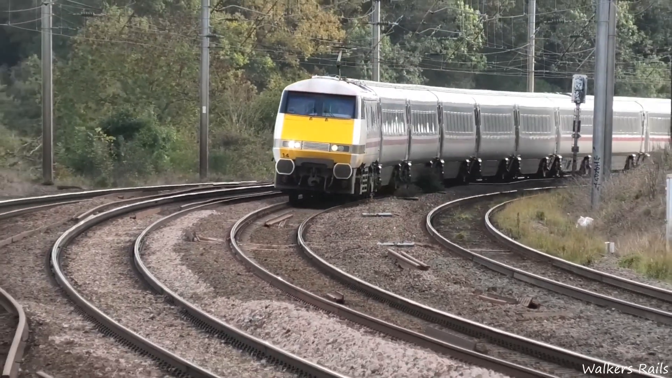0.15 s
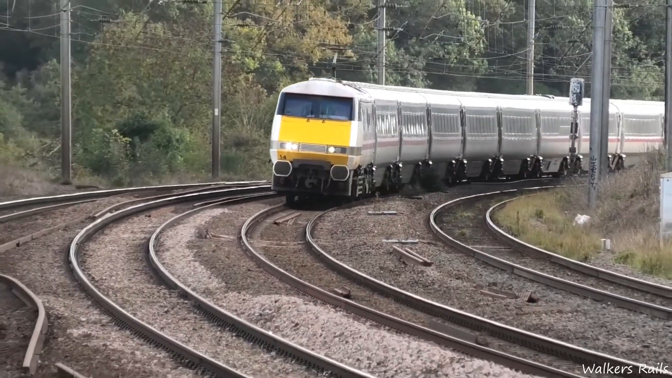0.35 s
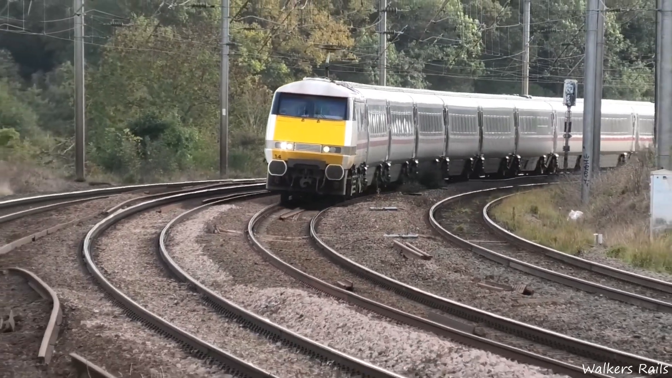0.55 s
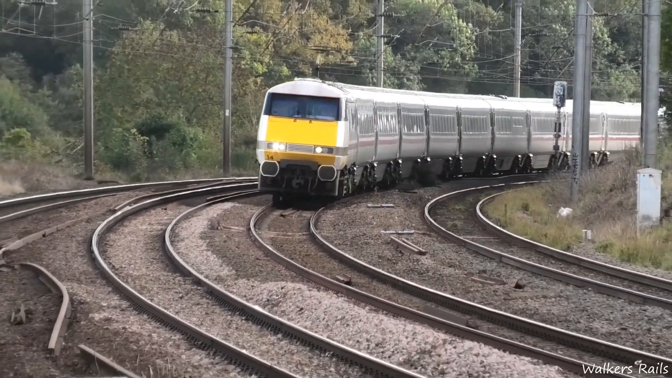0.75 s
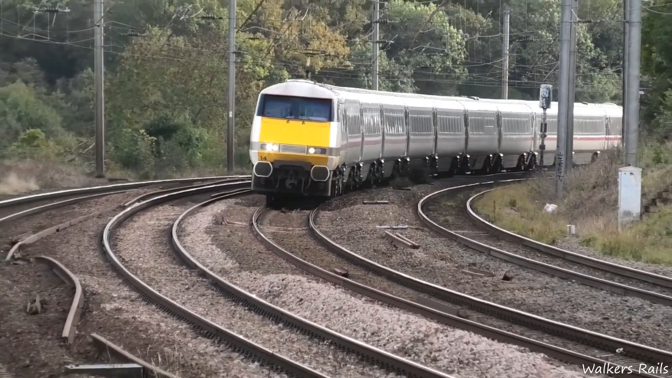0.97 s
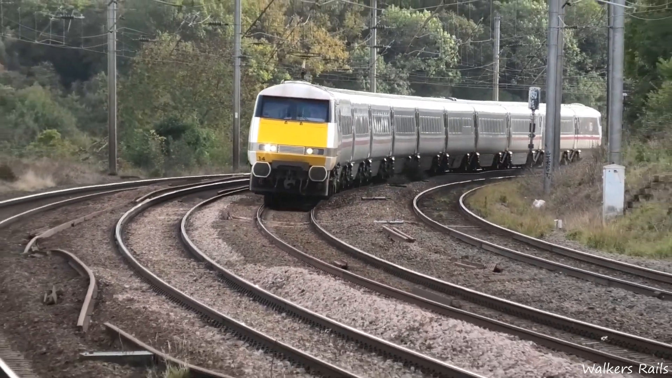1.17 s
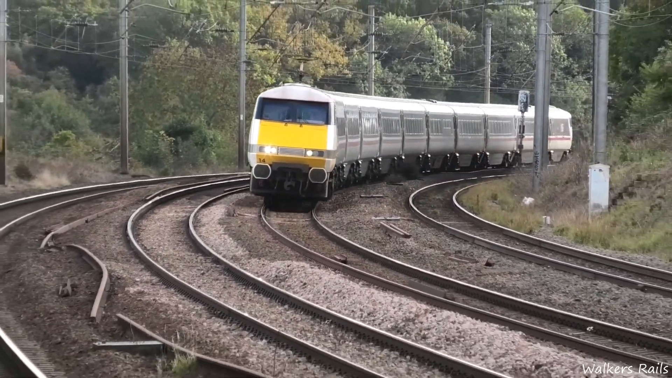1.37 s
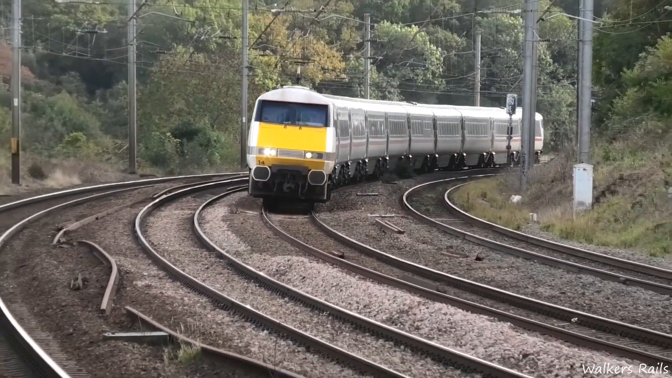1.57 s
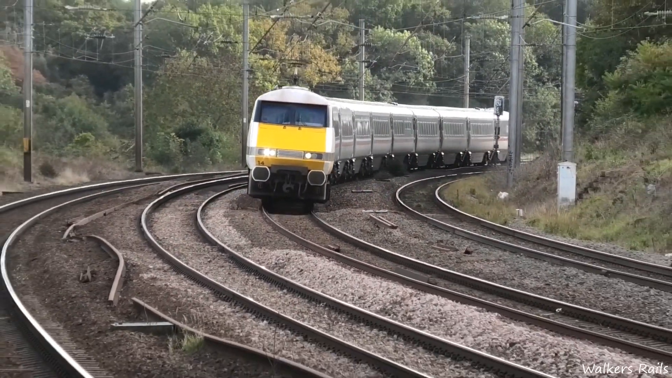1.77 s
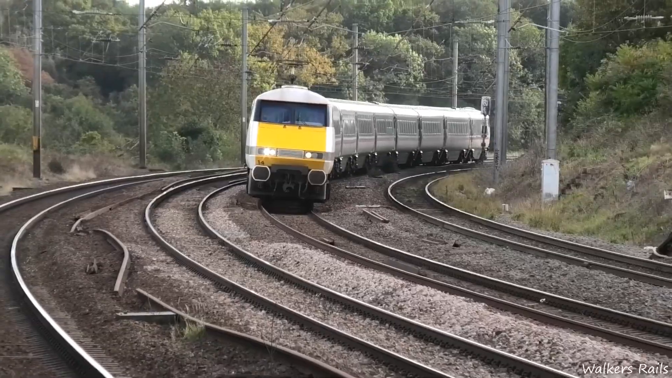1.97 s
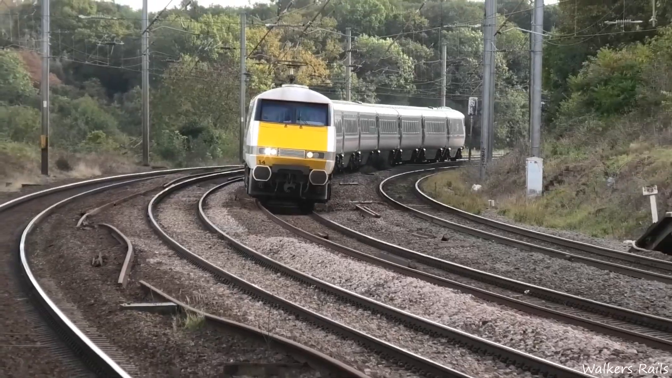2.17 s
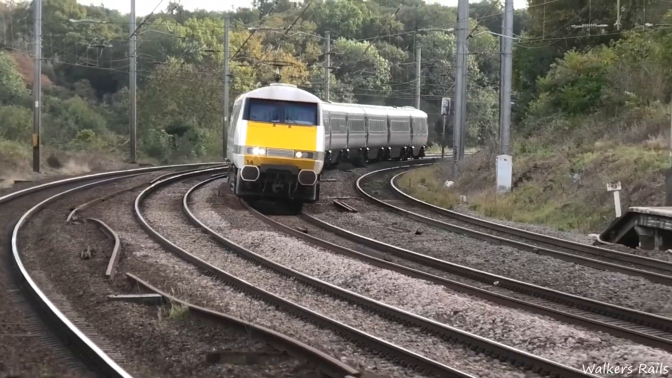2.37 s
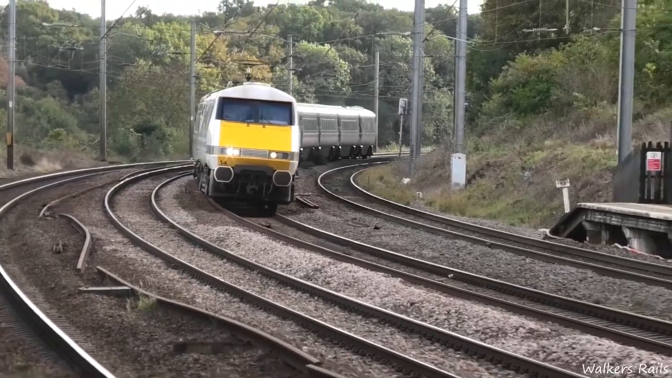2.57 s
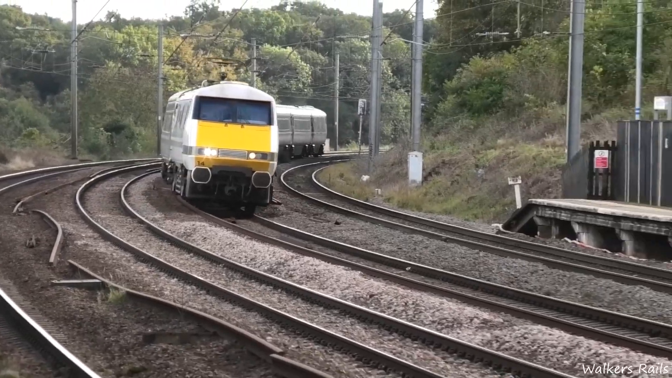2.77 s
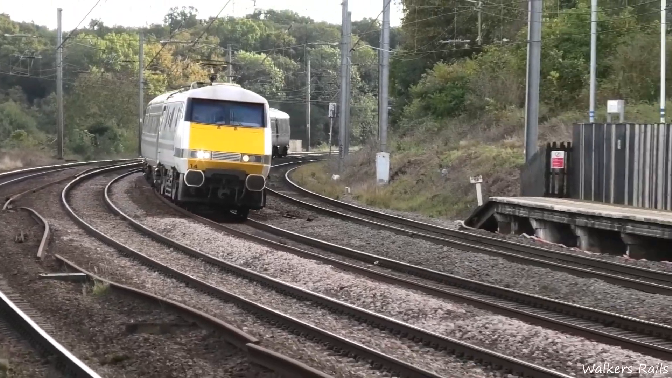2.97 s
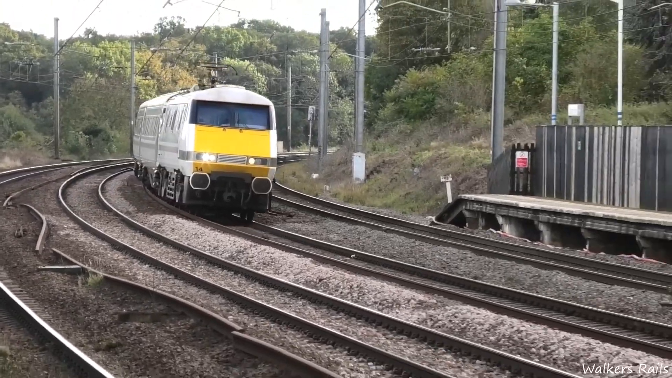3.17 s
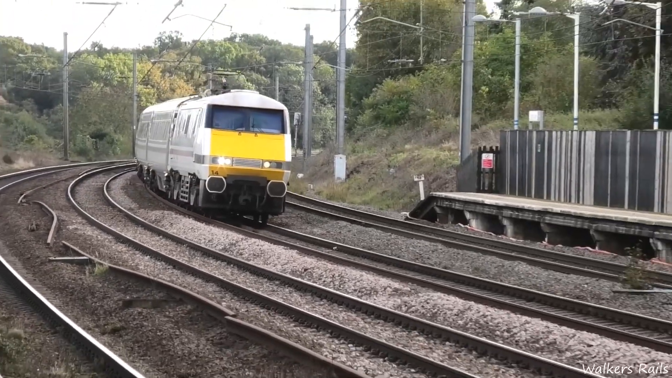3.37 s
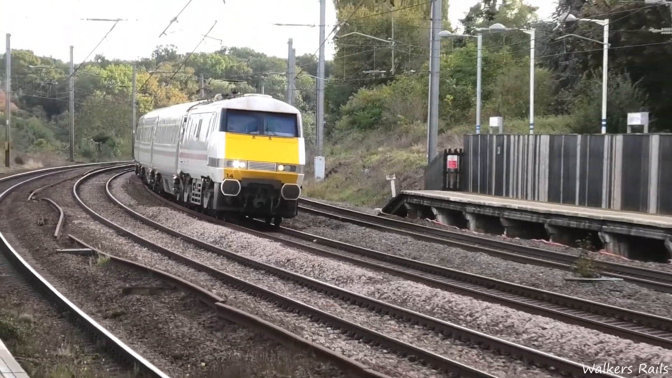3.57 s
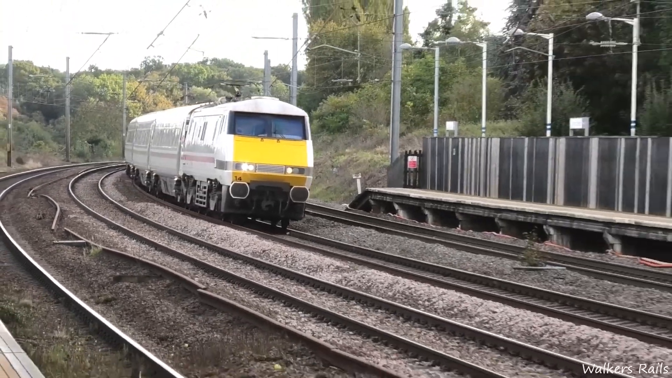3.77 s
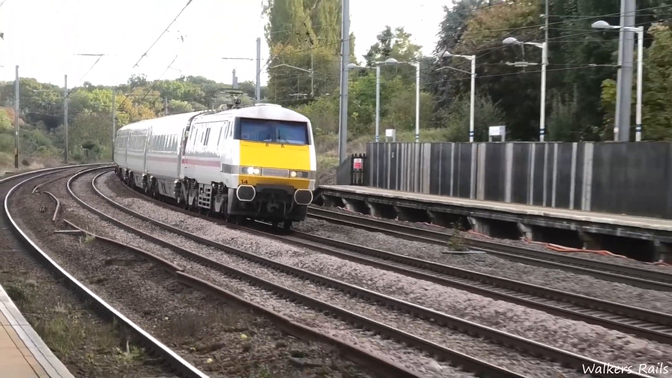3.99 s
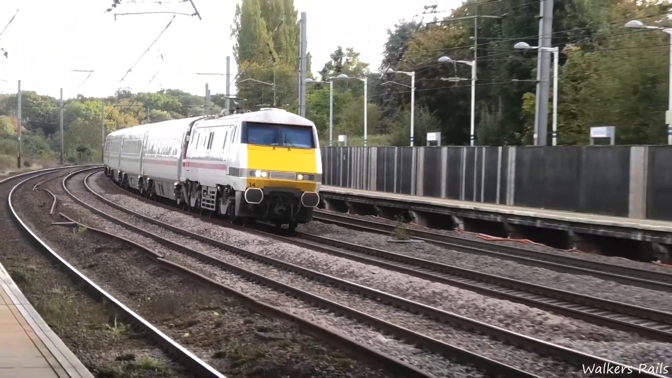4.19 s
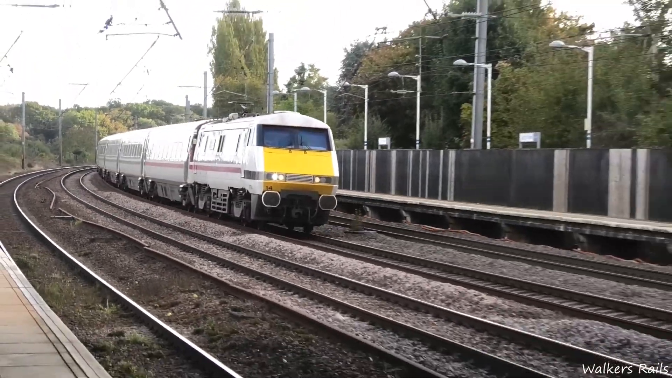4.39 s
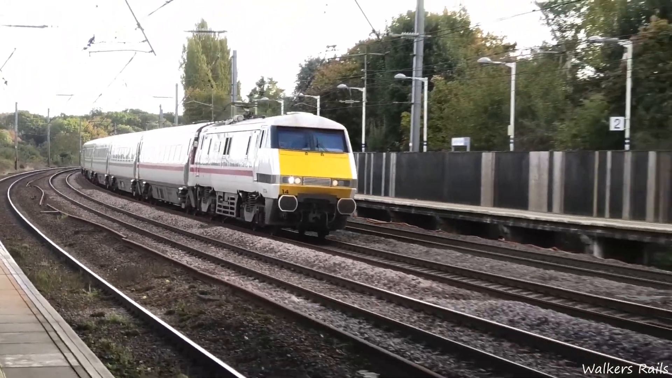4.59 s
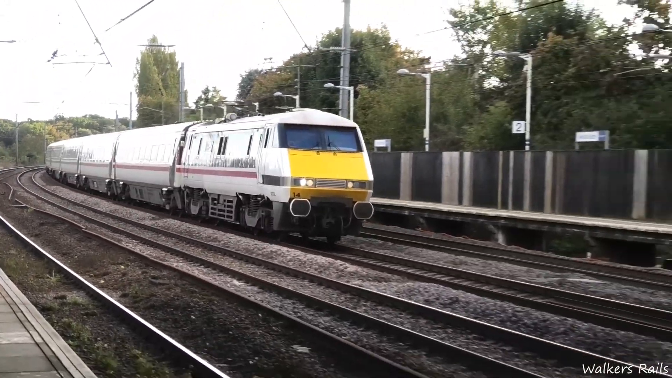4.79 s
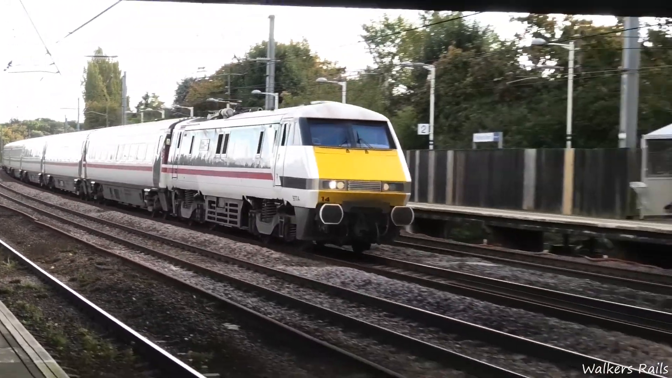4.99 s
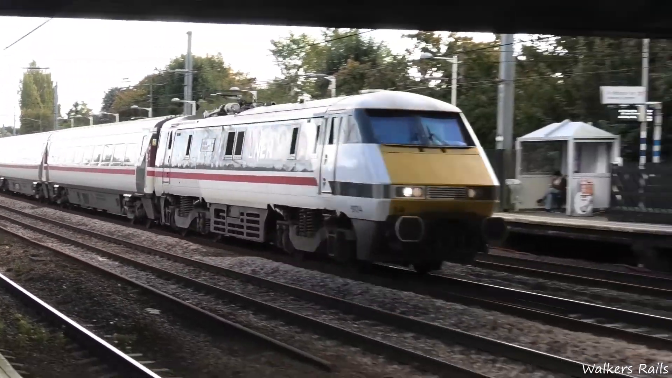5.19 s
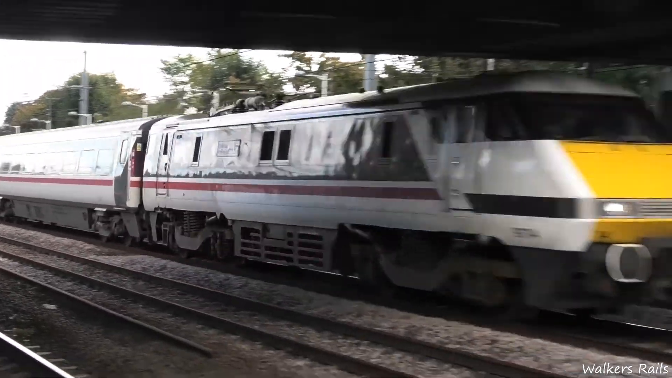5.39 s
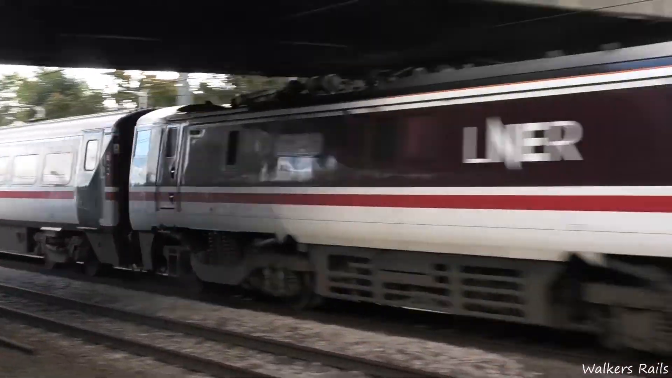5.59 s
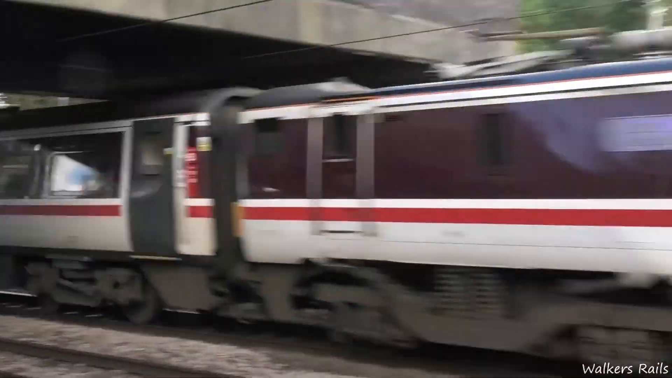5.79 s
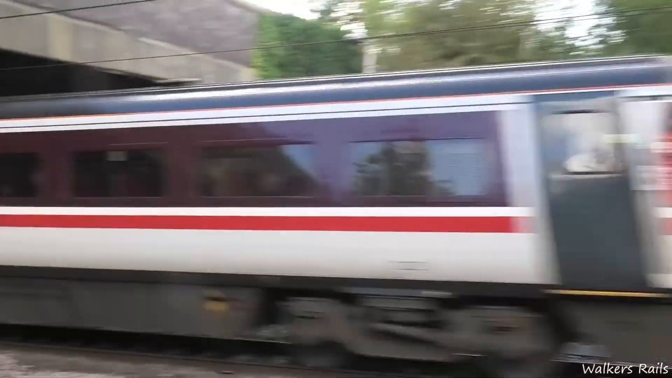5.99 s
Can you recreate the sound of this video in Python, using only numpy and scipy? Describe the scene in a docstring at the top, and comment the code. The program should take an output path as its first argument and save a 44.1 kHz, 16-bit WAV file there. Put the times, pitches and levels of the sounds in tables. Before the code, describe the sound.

An electric express approaches, heard from a station platform close to the track. It starts as a quiet wheel roar with low rumble and a steady motor whine, with light axle knocks over rail joints through the first two seconds. From about 1.5 seconds the rails sing and a thin, high wheel tone rings in the curve. The whine comes forward near 2.8 seconds, and a brief metallic ring follows around 3.3. Everything grows steadily louder, with heavier knocks at about 3.2, 4.1 and 4.4 seconds. From 5 seconds, deep rumble and hissing air open up as the train draws level. Hard knocks and droning surges land around 5.4 and 5.9. The locomotive passes at about 5.7, its whine dropping in pitch amid metallic whooshes. The roar is still at full strength at 6 seconds, slightly overloading the microphone.

```python
"""Express train passing a platform

One microphone on a station platform, 7 m from the track. An electric express rounds a curve and
sweeps past at 38 m/s. Rough wheels roar, the rails sing ahead of the train, axles knock over joints
and the locomotive whines. Rumble and rushing air open up as it draws level, the whine drops in
pitch, and the microphone overloads."""
import sys
import numpy as np
from scipy import signal
from scipy.fft import irfft, next_fast_len
from scipy.io import wavfile

SR = 44100
rng = np.random.default_rng(int(sys.argv[2]) if len(sys.argv) > 2 else 0)


def unload_wav(signal):
    """Save mono or channel-first audio to the path in sys.argv[1] as 16-bit WAV at rate SR, clipped to [-1, 1]."""
    wavfile.write(
        sys.argv[1],
        SR,
        np.round(np.clip(np.atleast_2d(signal).T, -1, 1) * 32767).astype(np.int16),
    )


N = 266364
T = np.arange(N) / SR
SPEED_M_S, MIC_DISTANCE_M, MOTORS_PASS_S = 38, 7, 5.68


def undb(db):
    """Decibels to gain."""
    return 10 ** (np.asarray(db) / 20)


def swell(s, half_s):
    """A bell curve that rises to 1 at time s and falls again."""
    return np.exp(-.5 * ((T - s) / half_s) ** 2)


def ramp(s, rise_s):
    """A straight rise from 0 to 1 that starts at time s, then holds."""
    return np.clip((T - s) / rise_s, 0, 1)


def wander(hz):
    """Smooth random motion of unit spread, about hz wide."""
    n = next_fast_len(N, real=True)
    f = np.arange(n // 2 + 1) * SR / n
    weight = np.exp(-.5 * np.minimum(f / hz, 10) ** 2)
    spectrum = rng.standard_normal(len(f)) + 1j * rng.standard_normal(len(f))
    motion = irfft(weight * spectrum, n)[:N]
    return motion / motion.std()


def shaped(x, spectra, times_s, size=2048):
    """Colour white noise, gliding from one spectrum to the next at constant power."""
    f, s, frames = signal.stft(x, SR, nperseg=size, noverlap=size - size // 4)
    octave, db = np.log2(f + 1), 0
    for rows, share in zip(spectra, np.eye(len(spectra))):
        hz, level = np.transpose(rows)
        outside = np.abs(octave - np.clip(octave, np.log2(hz[0]), np.log2(hz[-1])))
        colour = np.interp(octave, np.log2(hz), level) - 40 * outside  # skirts of 40 dB per octave
        db = db + np.outer(colour, np.interp(s, times_s, share))
    gain = undb(db)
    gain = gain / np.sqrt(np.mean(gain ** 2, axis=0))
    return signal.istft(frames * gain, SR, nperseg=size, noverlap=size - size // 4)[1][:N]


def blurred_tone(hz, width_hz):
    """A line of half unit power, blurred by many wheels and paths."""
    phase = 2 * np.pi * np.cumsum(np.broadcast_to(hz, N)) / SR
    return (wander(width_hz / 2) * np.cos(phase) + wander(width_hz / 2) * np.sin(phase)) / np.sqrt(2)


def firm_tone(hz, tremble, tremble_hz):
    """A line of unit power that keeps its strength and only trembles in pitch."""
    pitch = hz * (1 + tremble * wander(tremble_hz))
    return np.sqrt(2) * np.sin(2 * np.pi * np.cumsum(pitch) / SR)


def contact(rough_db, flutter_hz):
    """Countless tiny impacts whose force flutters with the load on the wheels."""
    force = rng.standard_normal(N) * undb(rough_db * wander(flutter_hz))
    return force / force.std()


def approach(arrival_s, near_db, db_per_doubling, db_per_m):
    """Level in dB: spreading and absorption shrink as the train nears; then the coaches hold it up."""
    distance = np.hypot(SPEED_M_S * np.maximum(arrival_s - T, 0), MIC_DISTANCE_M)
    spreading_db = db_per_doubling * np.log2(distance / MIC_DISTANCE_M)
    return near_db - spreading_db - db_per_m * (distance - MIC_DISTANCE_M)


def locomotive_pass():
    """Doppler ratio against the head-on pitch, and how far side-on the microphone hears it (0-1)."""
    ahead_m = SPEED_M_S * (MOTORS_PASS_S - T)
    cosine = ahead_m / np.hypot(ahead_m, MIC_DISTANCE_M)
    mach = SPEED_M_S / 343
    return (1 - mach) / (1 - mach * cosine), 1 - cosine ** 2


def recorder_hiss():
    """Faint steady hiss of the recorder behind everything."""
    return undb(-80) * rng.standard_normal(N)


def rail_ticks(decay_s):
    """Faint crisp ticks run ahead of the train along the rails and die quickly."""
    # tick onsets: t/s, level/dB
    onsets = [(3.10, -70), (3.205, -66), (3.34, -68), (3.375, -67)]
    bursts = sum(undb(db) * (T >= s) * np.exp(-np.abs(T - s) / decay_s) for s, db in onsets)
    return bursts * blurred_tone(13200, width_hz=2800)


def ring_and_hum():
    """Wheels in the curve ring a thin resonance that swells and creeps up; below it a steady tone of the
    locomotive holds."""
    thin = undb(-86 + 22 * swell(3.2, .8)) * blurred_tone(7020 + 60 * T, width_hz=110)
    low_hz = 2424
    low = firm_tone(low_hz, tremble=.003, tremble_hz=25) + blurred_tone(low_hz, width_hz=30)
    return thin + undb(-49) * ramp(1.35, rise_s=.4) * low / np.sqrt(2)


def metal_flares():
    """Resonances of wheel and rail swell for a moment into metallic flares and whooshes."""
    # flares: t/s, f/Hz, width/Hz, half length/s, level/dB
    flares = [(.85, 2630, 220, .13, -52), (3.27, 3000, 50, .07, -44), (3.37, 13150, 500, .04, -73),
              (4.788, 1500, 30, 0.061, -29.5), (5.7, 728, 260, 0.081, -15.5), (5.906, 900, 90, 0.03, -10)]
    return sum(undb(db) * swell(s, half_s) * blurred_tone(hz, width)
               for s, hz, width, half_s, db in flares)


def bogie_drone(width_hz, blur_db):
    """Bogies drone faintly from afar, then loudly, sagging in pitch as each group sweeps past."""
    # passing groups: t/s, half length/s, f/Hz, sag/(Hz/s), level of the firm core/dB
    bogies = [(5.33, .12, 498, 70, -21), (5.94, .09, 498, 280, -11.8)]
    drone = undb(-48) * blurred_tone(496, width_hz)
    for s, half_s, hz, sag, db in bogies:
        pitch = hz - sag * (T - s)
        core = firm_tone(pitch, tremble=.015, tremble_hz=25)
        blur = undb(blur_db) * blurred_tone(pitch, width_hz)
        drone += undb(db) * swell(s, half_s) * (core + blur)
    return drone


def cooling_fan():
    """A short falling whine, heard only as the locomotive's side passes the microphone."""
    doppler, _ = locomotive_pass()
    blades = firm_tone(2470 * doppler, tremble=.018, tremble_hz=90)
    return undb(-23) * swell(MOTORS_PASS_S, .065) * blades


def axle_knocks(gain_db, scatter):
    """Axles strike the joints; each blow rings the track, tuned a little differently every time."""
    # blows: t/s, peak level before gain_db/dB
    blows = [(0.38, -29), (0.474, -31), (0.749, -32), (0.835, -32), (1.004, -29), (1.105, -23),
             (1.345, -24), (1.94, -27), (2.228, -22), (3.041, -27), (3.222, -14), (4.115, -13), (4.372, -9),
             (5.451, -6), (5.851, -4)]
    # track resonances: f/Hz, t60/s, relative level/dB
    modes = [(317, 0.037, -5), (420, 0.035, -1.5), (492.5, .045, -6), (680, .03, -10), (925, .03, -12),
             (1330, 0.016, -14)]
    hz, t60, db = np.transpose(modes)[:, :, None]
    track, t = np.zeros(N + SR), T[:SR // 5]
    decays = undb(db) * np.exp(-np.log(1000) * t / t60)
    for s, peak_db in blows:
        detuned_hz = hz * (1 + scatter * rng.standard_normal(hz.shape))
        ring = np.sum(decays * np.sin(2 * np.pi * detuned_hz * t), axis=0)
        ring *= 1 - np.exp(-t / .003)  # the blow builds over a few milliseconds
        start = int(s * SR)
        track[start:start + len(t)] += undb(peak_db + gain_db) * ring / np.abs(ring).max()
    return track[:N]


def motor_whine():
    """Motors and gears hold their pitch head-on, then drop as the locomotive goes by."""
    # lines heard head-on: f/Hz, width/Hz, relative level/dB
    lines = [(932, 21, -19), (951, 9, -15), (940, 90, -14), (1544, 34, -24), (1793, 3.5, -23),
             (1880, 9.7, -23.5), (2003, 6.2, -31)]
    doppler, side_on = locomotive_pass()
    level_db = approach(5.68, near_db=-12.7, db_per_doubling=.7, db_per_m=.145)
    # the whine beams forward: stronger as the nose swings towards the platform, weaker from the side
    beam_db = 4.5 * swell(2.78, .25) - 6 * side_on
    gear_mesh = undb(-14) * firm_tone(931.5 * doppler, tremble=.005, tremble_hz=11.4)
    blurred = sum(undb(db) * blurred_tone(hz * doppler, width) for hz, width, db in lines)
    return undb(level_db + beam_db) * (gear_mesh + blurred)


def steel_hiss(boost_db):
    """Treble hiss of rolling steel and rushing air."""
    # spectra far off, approaching and alongside: f/Hz, relative level/dB
    far = [(3500, -10), (5200, -3), (6600, 1), (7100, 3), (7600, -7.5), (9500, -13), (11500, -14),
           (15500, -14)]
    mid = [(3500, -19), (5200, -6.5), (6600, 3.5), (7100, 3), (7600, -5), (9500, -6.5), (11500, -16),
           (15500, -16)]
    near = [(3500, -6), (5200, 0.5), (6600, -0.5), (7100, -0.5), (7600, -2), (9500, -5.5), (11500, -13.5),
            (15500, -23)]
    hiss = shaped(contact(rough_db=.5, flutter_hz=35), [far, mid, near], times_s=[1.8, 4.2, 5.4])
    level_db = approach(5.7, near_db=-32.6, db_per_doubling=5.6, db_per_m=.1)
    return undb(level_db + boost_db) * hiss


def rail_song(boost_db):
    """High bending waves make the rails sing ahead of the train."""
    # spectra far off and alongside: f/Hz, relative level/dB
    far = [(1400, -4), (1900, -5.5), (2300, -2), (2750, 1.5), (3200, -4), (4000, -10), (4500, -19),
           (5100, -31), (6500, -50)]
    near = [(1400, -15), (1900, -0.5), (2300, 2), (2750, -3), (3200, -6.5), (4000, -9.5), (4500, -13.5),
            (5100, -23.5), (6500, -40)]
    song = shaped(contact(rough_db=.65, flutter_hz=30), [far, near], times_s=[2.8, 5.2])
    level_db = approach(5.76, near_db=-20.9, db_per_doubling=3.7, db_per_m=.082)
    return undb(level_db + boost_db) * song


def ground_rumble(boost_db, floor_db=-50):
    """The wheels shake the ground, over a floor of distant rumble that is there without the train."""
    # spectra far off, out of the bend, approaching and alongside: f/Hz, relative level/dB
    far = [(20, 2), (40, -5), (75, 3.5), (125, -7), (170, 3.5), (240, -7)]
    bend = [(20, -4), (60, -11), (90, -4.5), (125, -10), (170, 6), (240, -20)]
    mid = [(20, -14), (60, -34), (88, -8.5), (130, 2.5), (165, 0.5), (240, -17)]
    near = [(20, -24), (50, -11), (85, 2), (120, -5), (160, 0.5), (240, -14)]
    force = contact(rough_db=.24, flutter_hz=9.2)
    rumble = shaped(force, [far, bend, mid, near], times_s=[1.5, 3.4, 4.97, 5.35])
    level_db = approach(5.35, near_db=-20.8, db_per_doubling=4.9, db_per_m=.08)
    return np.hypot(undb(level_db + boost_db), undb(floor_db)) * rumble


def wheel_roar(boost_db):
    """Rough wheels shake the track and sleepers; the roar broadens as it nears the microphone."""
    # spectra far off, approaching, close by and alongside: f/Hz, relative level/dB
    far = [(120, -26), (175, -15), (230, -10), (300, -5.5), (460, 0), (520, -1), (600, -8.5), (900, -11.5),
           (1250, -15), (1700, -20.5), (2400, -25)]
    mid = [(120, -25), (190, -10.5), (270, -3.5), (350, 0.5), (470, 1), (600, -2.5), (800, -7.5),
           (1000, -5.5), (1400, -10.5), (1700, -17), (2400, -23.5)]
    close = [(120, -28), (200, -5), (270, -1), (380, 2), (470, -0.5), (600, -6), (780, -5.5), (950, -2.5),
             (1100, -8.5), (1500, -10.5), (1800, -19), (2400, -25.5)]
    near = [(120, -29), (200, -3.5), (290, -2), (400, 1.5), (560, -1.5), (640, -0.5), (780, -0.5),
            (950, -2.5), (1300, -6.5), (1700, -11), (2400, -23.5)]
    force = contact(rough_db=.34, flutter_hz=25)
    roar = shaped(force, [far, mid, close, near], times_s=[.5, 2.8, 4.6, 5.5])
    level_db = approach(5.73, near_db=-11.3, db_per_doubling=2.6, db_per_m=.071)
    return undb(level_db + boost_db) * roar


def rolling():
    """Four bands of rolling noise, with brief swells and a lift from the bend and a road bridge."""
    # brief swells as the train nears and its bogies pass:
    # t/s, half length/s, roar/dB, rumble/dB, rails and hiss/dB
    surges = [(1.4, .2, 1.5, 0, 1.2), (2.35, .25, 1.3, 0, 0), (2.74, .06, 1.3, 1, 1.3),
              (3.25, .12, 1.2, 0, 1), (3.85, .2, .7, 2.2, 0), (4.55, .09, .6, 2, 1.2), (4.98, .04, 0, 3, 0),
              (5.36, .07, 1, 3, 1), (5.7, .045, .8, 0, 1.5), (5.85, .04, 0, 4.5, 0), (5.97, .06, 0, 0, 1.5)]
    roar_db, rumble_db, treble_db = sum(np.outer(db, swell(s, half_s)) for s, half_s, *db in surges)
    bend = swell(2.5, .85)  # the wheels press harder on the rails through the curve
    bridge_db = 1.3 * ramp(4.96, rise_s=.15)  # walls and deck throw sound back once the train runs in
    roar = wheel_roar(roar_db + bridge_db)
    rumble = ground_rumble(rumble_db)
    rails = rail_song(treble_db + bridge_db + 5.4 * bend)
    hiss = steel_hiss(treble_db + bridge_db + bend)
    return roar + rumble + rails + hiss


def scene():
    """The whole train in mono, heard from the platform."""
    track = rolling() + axle_knocks(gain_db=-5, scatter=.039)
    steel = ring_and_hum() + metal_flares() + rail_ticks(decay_s=.018)
    drone = bogie_drone(width_hz=50, blur_db=-2)
    return (recorder_hiss() + track + steel + drone + motor_whine() + cooling_fan())[None]


def record(dry):
    """The overloaded microphone rounds off the loudest peaks; the top is cut at 15.7 kHz."""
    rounded = dry / (1 + dry ** 8) ** (1 / 8)
    lowpass = signal.ellip(10, .1, 70, 15700, fs=SR, output="sos")
    return signal.sosfilt(lowpass, rounded)


dry = scene()
out = record(dry)
unload_wav(out)
```